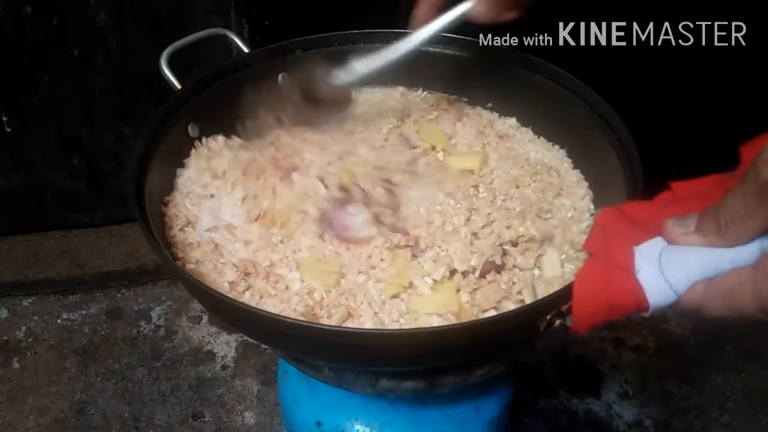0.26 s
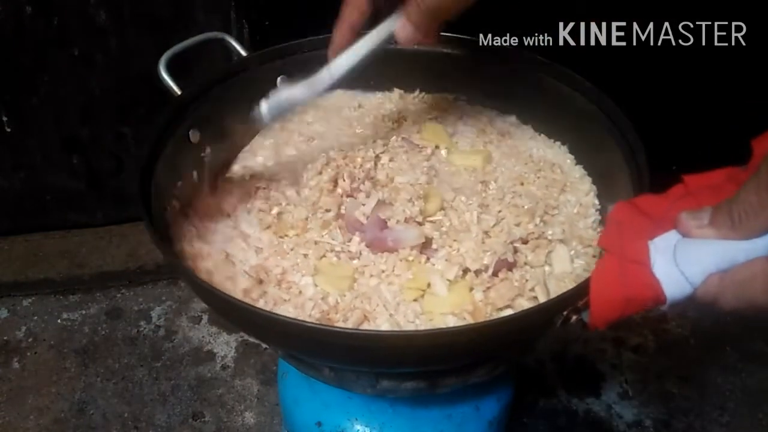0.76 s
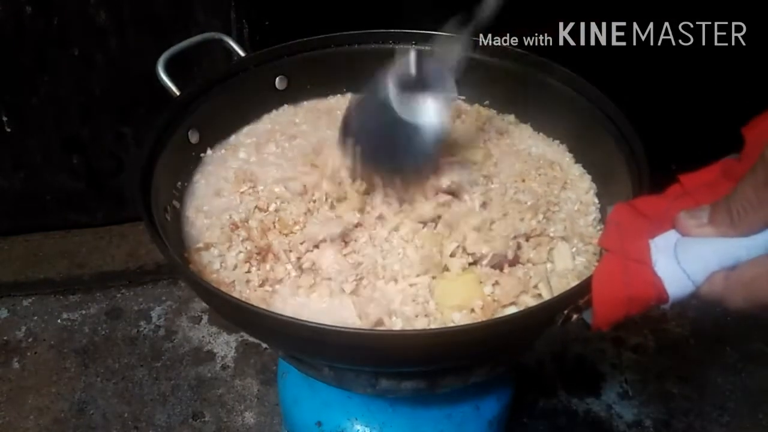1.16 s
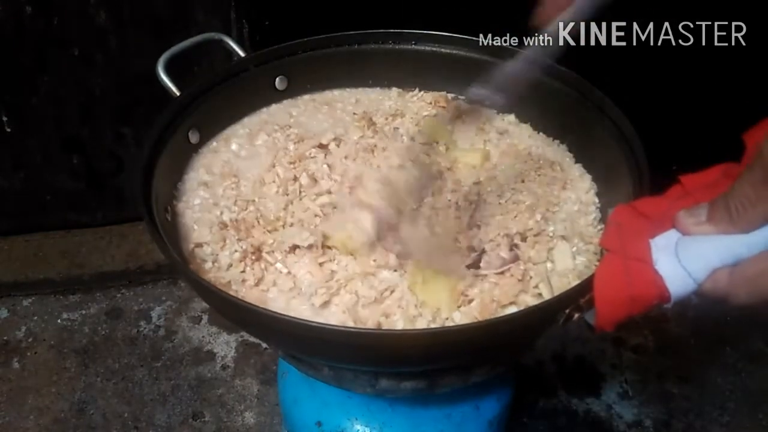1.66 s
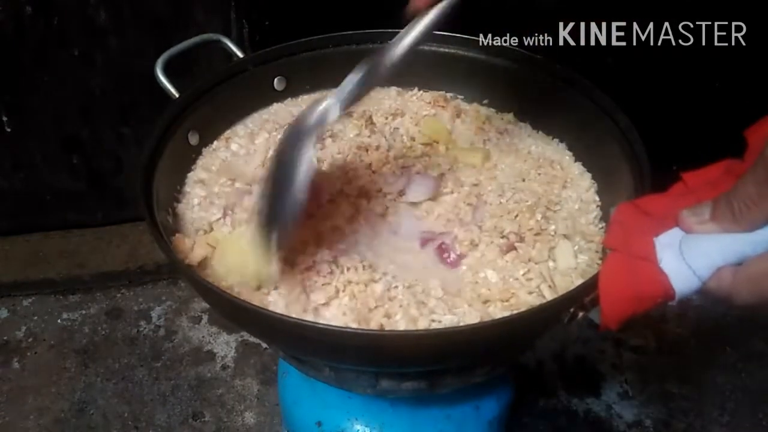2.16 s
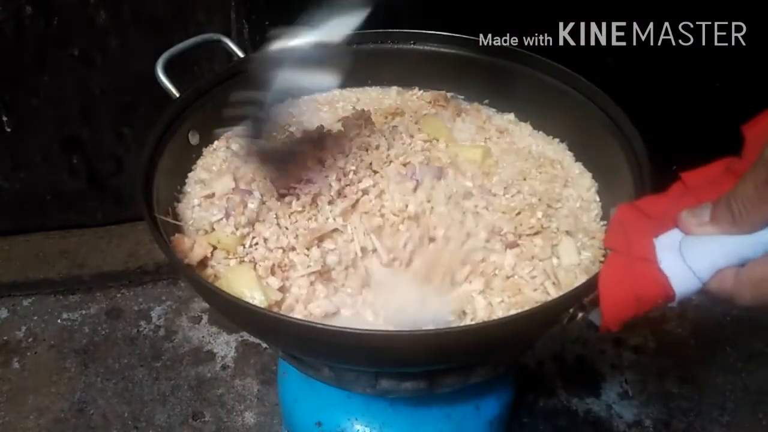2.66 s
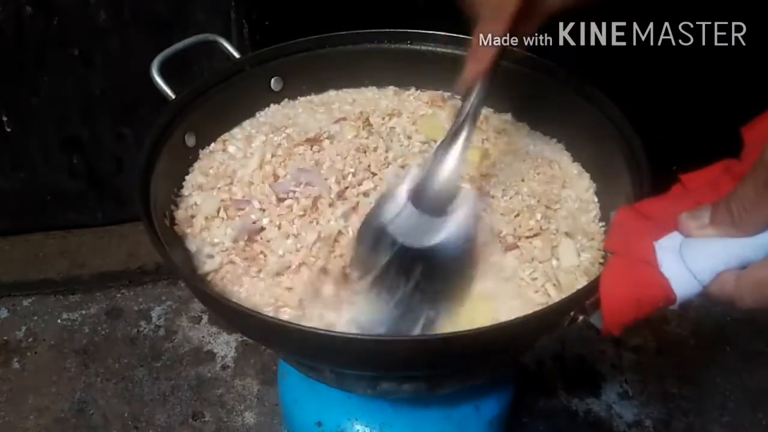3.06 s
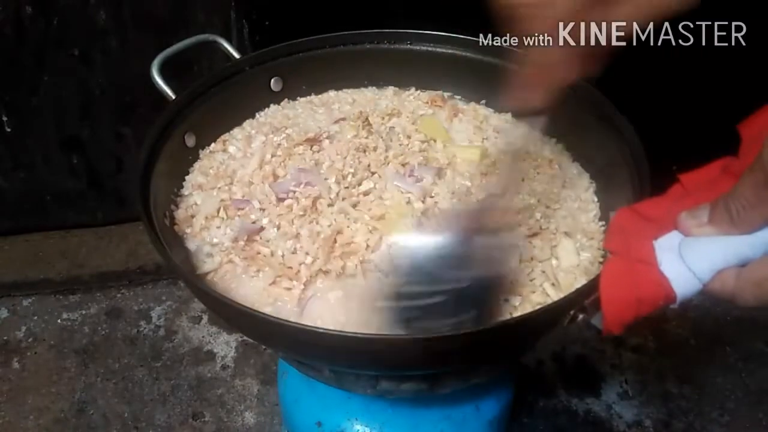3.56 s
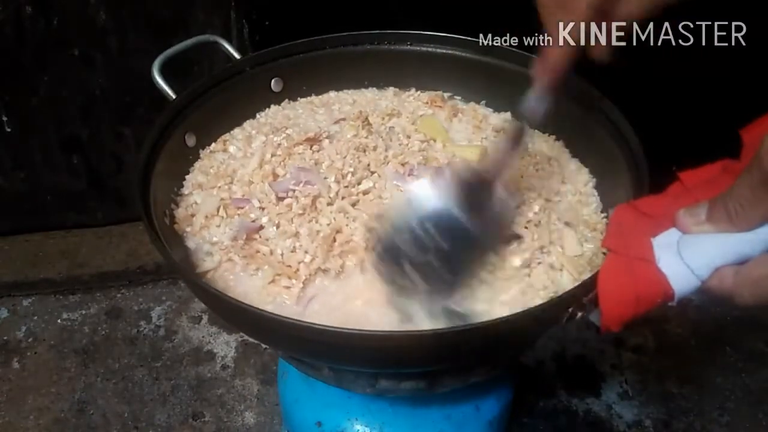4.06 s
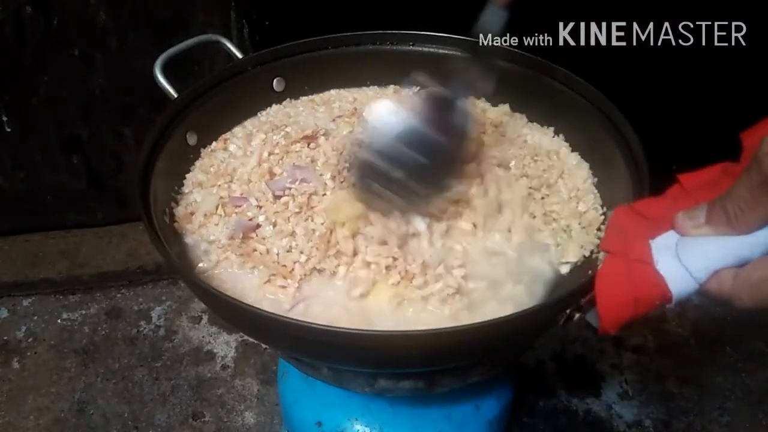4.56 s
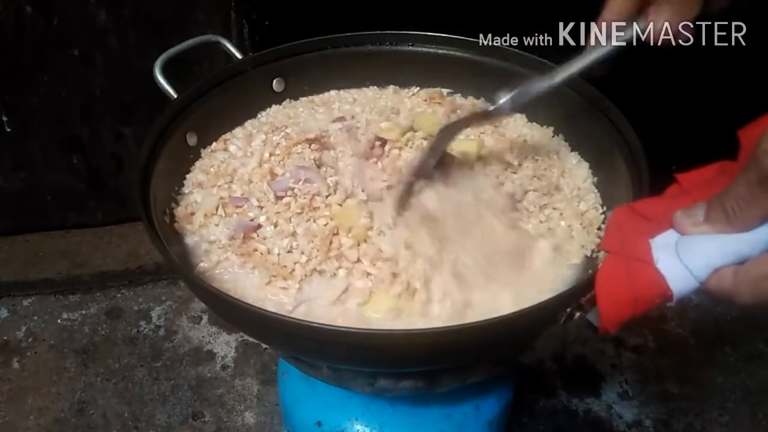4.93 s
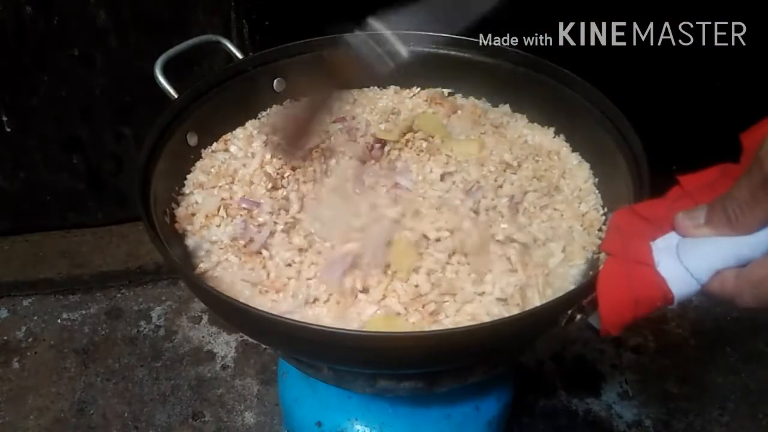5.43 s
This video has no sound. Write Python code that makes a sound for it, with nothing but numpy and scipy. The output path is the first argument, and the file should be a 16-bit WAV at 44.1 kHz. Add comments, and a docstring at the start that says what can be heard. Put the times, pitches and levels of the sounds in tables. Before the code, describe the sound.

A metal ladle stirs a thick wet rice mixture in a wok, knocking and scraping the pan with ringing clanks.

```python
"""Close by in a small kitchen, a steel ladle turns a thick rice mixture in a wok; one mono microphone.
A knock opens: a short contact excites decaying pan and ladle modes. Stirs fizz as filtered clicks and noise,
with a few wet pops; shoves swell a low rumble of the stand. From 1.6 s more knocks come, each led by a soft bump,
and from 2.5 s slides up the wall, stick-slip clicks that ring the steel harder as they go. From 4.1 s a faint low hum
of three partials swells and fades; near 5.4 s the ladle drags and rubs; a last knock falls in it, singing lasts beyond."""
import sys
import numpy as np
from scipy import signal
from scipy.fft import rfft, irfft
from scipy.io import wavfile
from scipy.ndimage import uniform_filter1d

SR = 44100
rng = np.random.default_rng(int(sys.argv[2]) if len(sys.argv) > 2 else 0)


def pcm_store(signal):
    """Save signal as 16-bit PCM."""
    levels = np.round(np.clip(np.atleast_2d(signal), -1, 1) * 32767)
    wavfile.write(sys.argv[1], SR, levels.astype(np.int16).T)


N = 250929
T = np.arange(N) / SR

# Ladle blows on the pan: [t/s, contact/ms, buzz 0-1 (acts up to 0.7), favoured bowl, wall and ladle modes f/Hz (3),
# bowl, wall and ladle level/dB (3), fall of the wall's sound away from its mode dB/octave]
BLOWS = [(0.0, 1.1, 0.11, 645, 905, 7650, -58, -47.5, -49, 4),
         (1.6372, 1.06, 0, 303, 919, 7600, -45.5, -34.5, -40, 3),
         (1.967, 0.72, 0, 425, 2170, 5959, -52.5, -37, -29.5, 2),
         (2.481, 1.15, 0.41, 442, 2230, 9345, -63.5, -52, -44, -0.5),
         (2.619, 3.7, 0, 595, 1250, 9400, -57.5, -44.5, -65, 2),
         (3.0363, 0.96, 0.13, 635, 2610, 4400, -74, -82, -60, 20),
         (3.229, 7.5, 0, 464, 1039, 9280, -64, -38, -61, 8),
         (3.241, 9.5, 0, 627, 1502, 9280, -77, -42.5, -55, 18.5),
         (3.6168, 0.86, 0.6, 413, 1062, 8700, -57, -47.5, -41.5, -1),
         (3.625, 2.7, 0.73, 433, 1060, 9300, -54.5, -47.5, -41, 9),
         (3.694, 1.7, 0.3, 415, 1090, 8550, -68, -71, -54.5, 7),
         (3.736, 3.9, .5, 433, 2220, 8700, -69.5, -72, -51.5, 2),
         (4.1016, 2.3, 0.25, 442, 1496, 10322, -64.5, -49, -37.5, 2.5),
         (4.229, 4.5, 0.014, 615, 904, 9300, -72, -57.5, -60, 15),
         (4.4833, 2.9, 0.28, 308, 2328, 4250, -60.5, -47.5, -38, -3),
         (4.618, 8.6, 0.15, 604, 888, 9150, -68.5, -50.5, -51.5, 10),
         (5.49, 11, 0.37, 273, 1145, 8231, -67, -57.5, -82, 17)]


def undb(db):
    """Decibels to gain."""
    return 10 ** (np.asarray(db) / 20)


def unit(x):
    """Scale to rms 1."""
    return x / np.sqrt(np.mean(x ** 2) + 1e-24)


def fade(t, t60):
    """Exponential decay that loses 60 dB in t60 seconds."""
    return np.exp(-np.log(1000) * t / max(t60, 1e-3))


def curve(rows, column=1):
    """Gain over time from a dB column of (s, ..) rows."""
    rows = np.asarray(rows)
    return undb(np.interp(T, rows[:, 0], rows[:, column]))


def gesture(start, length, attack, t60):
    """Gain of one movement: it rises over attack seconds, holds to the end of its length, then dies away."""
    rise = np.clip((T - start) / max(attack, 1e-3), 0, 1)
    return rise * fade(np.maximum(T - start - length, 0), t60)


def flutter(rate, depth_db):
    """A gain that wanders at random, about rate times a second."""
    knots = rng.standard_normal(2048)
    return undb(depth_db * np.interp(T * rate, np.arange(len(knots)), knots))


def clicks(rate, spread_db):
    """Random tiny impacts, on average rate a second, of uneven size and either sign."""
    sizes = undb(spread_db * np.minimum(rng.exponential(size=N), 4))
    signed = sizes * rng.choice([-1, 1], N)
    return unit(signed * (rng.random(N) < rate / SR))


def band(x, lo, hi, order=3):
    """Band-pass between two edges in Hz."""
    sos = signal.butter(order, [lo, min(hi, .45 * SR)], "band", fs=SR, output="sos")
    return signal.sosfilt(sos, x)


def colour(x, points):
    """Filter by a (Hz, dB) spectrum, causally, so that attacks stay sharp."""
    hz, db = np.transpose(points)
    size = 2048
    f = np.maximum(np.fft.rfftfreq(size, 1 / SR), 1)
    cepstrum = irfft(np.log(undb(np.interp(np.log(f), np.log(hz), db))))
    # folding the cepstrum gives minimum phase
    cepstrum[1:size // 2] *= 2
    cepstrum[size // 2 + 1:] = 0
    response = irfft(np.exp(rfft(cepstrum)))
    return signal.fftconvolve(x, response)[:len(x)]


def focus(x, hz, db_per_octave):
    """Weaken a sound by so many dB for each octave away from hz; a negative slope lifts it instead."""
    octaves = np.arange(-3, 4)
    return colour(x, np.transpose([hz * 2. ** octaves, -db_per_octave * np.abs(octaves)]))


def hum():
    """A low hum, as of a motor some way off: wavering harmonics that swell and die away."""
    # Partials of the hum: [multiple of the fundamental, level/dB]
    partials = [(1, 0), (2, -21), (3, -24)]
    hum_hz, level_db = 75.2, -57
    start_s, length_s, attack_s, release_t60 = 4.084, 1.306, 0.42, 0.42
    tone = sum(undb(db) * np.sin(2 * np.pi * k * hum_hz * T) for k, db in partials)
    swell = gesture(start_s, length_s, attack_s, release_t60)
    return undb(level_db) * unit(tone) * swell * flutter(rate=18, depth_db=3)


def stand(rock_s=0.06):
    """Shoves and knocks rock the heavy pan on its stand: low noise swelling over a faint rumble."""
    # Spectrum of the stand: [f/Hz, level/dB per Hz]
    stand_spectrum = [(25, -31), (50, -12.5), (68, -2), (78, -11.5), (90, -2), (102, -6.5), (120, -10.5),
                      (160, -13), (220, -25.5)]
    # Shoves on the pan: [t/s, length/s, level/dB]
    shoves = [(.29, .05, -64), (.47, .13, -58), (1.01, 0.037, -70), (1.22, 0.047, -72), (1.54, 0.03, -61.5),
              (2.25, 0.031, -85.5), (2.39, 0.16, -63.5), (2.71, 0.037, -60.5), (2.96, 0.047, -63),
              (3.26, 0.03, -63), (3.39, 0.026, -58), (3.745, 0.049, -55.5)]
    attack_s, release_t60 = 0.026, 0.34
    rumble_db, knock_rock_db = -71.5, -12  # steady rumble; rocking by a knock, relative to its bowl level
    rumble = unit(band(colour(rng.standard_normal(N), stand_spectrum), 22, 260))
    # dividing by its own 0.1 s level evens the rumble out
    swell = np.sqrt(uniform_filter1d(rumble ** 2, SR // 10))
    knock_pushes = [(s, rock_s, bowl_db + knock_rock_db) for s, _, _, _, _, _, bowl_db, *_ in BLOWS]
    pushes = list(shoves) + knock_pushes
    power = sum((undb(db) * gesture(s, length, attack_s, release_t60)) ** 2 for s, length, db in pushes)
    return rumble / swell * np.sqrt(power + undb(rumble_db) ** 2)


def mixture(fizz_rest_db=-83):
    """Wet grains slide and part: small low squelches under a fine fizz that swells and settles with each stir."""
    # Spectrum of the squelches: [f/Hz, level/dB per Hz]
    squelch_spectrum = [(120, 0.5), (220, -17), (500, -2.5), (800, -4), (1020, 4.5), (1200, -2),
                        (1450, -2.5), (1700, -5), (2050, -0.5), (2400, -8), (2650, 5.5), (2950, -16),
                        (4000, -20.5), (7000, -18.5)]
    # Edges of the bands that flutter apart: [f/Hz]
    squelch_edges = [90, 450, 850, 1250, 1800, 2350, 12000]
    # Spectrum of the fizz: [f/Hz, level/dB per Hz]
    fizz_spectrum = [(2500, -25), (4200, -23.5), (5800, -16.5), (7300, -6.5), (8200, 3), (9500, 0),
                     (11200, 0), (12000, -11), (14200, -11)]
    # Ladle pushing through the food: [t/s, length/s, fizz level/dB]
    stirs = [(-.1, 1.12, -64.5), (1.192, 0.044, -64), (1.526, 0.34, -62.5), (2.03, 0.28, -62.5),
             (2.361, 0.41, -63.5), (3.057, 0.5, -63.5), (3.316, 0.14, -68), (3.753, 0.092, -59.5),
             (4.144, 0.13, -61), (4.578, 0.14, -62), (4.93, 0.06, -71), (5.087, 0.043, -67.5),
             (5.36, 0.065, -66)]
    attack_s, settle_t60 = 0.052, 1
    squelch_rest_db, squelch_stir_db = -70, -6  # food at rest; what stirring adds, relative to the fizz
    movements = [undb(db) * gesture(s, length, attack_s, settle_t60) for s, length, db in stirs]
    stirring = np.max(movements, axis=0)

    squelch = np.zeros(N)
    for lo, hi in zip(squelch_edges, squelch_edges[1:]):
        grains = clicks(rate=1800, spread_db=-1) + 0.46 * rng.standard_normal(N)
        # squelches of different size come and go on their own
        squelch += band(colour(grains, squelch_spectrum), lo, hi) * flutter(rate=15, depth_db=3)
    squelch_gain = np.hypot(undb(squelch_rest_db), undb(squelch_stir_db) * stirring)

    fine_grains = clicks(rate=8700, spread_db=4.5) + 0.98 * rng.standard_normal(N)
    fizz = unit(colour(fine_grains, fizz_spectrum))
    fizz_gain = np.hypot(undb(fizz_rest_db), stirring)
    return (unit(squelch) * squelch_gain * flutter(rate=23, depth_db=1.34)
            + fizz * fizz_gain * flutter(rate=9.7, depth_db=-0.5))


def pops(pop_t60=0.14):
    """A pocket in the wet food opens with a short smack: band-passed noise that starts at once and decays."""
    # Small wet pops: [t/s, f/Hz, width/Hz, level/dB]
    pockets = [(0.336, 600, 600, -64), (.692, 3500, 900, -77), (1.021, 2770, 250, -68),
               (5.093, 2900, 980, -58.5)]
    out = np.zeros(N)
    for s, hz, width, db in pockets:
        smack = unit(band(rng.standard_normal(N), hz - width / 2, hz + width / 2, order=2))
        out += undb(db) * smack * (T >= s) * fade(np.abs(T - s), pop_t60)
    return out


def drag():
    """Cushioned by food, the ladle's rub stirs a few low resonances of the pan, and one mode sings."""
    # Ladle dragged through the food: [t/s, rub level/dB, singing mode level/dB]
    strokes = [(5.32, -78, -95.5), (5.38, -60, -86.5), (5.43, -66.5, -73), (5.48, -68.5, -66),
               (5.56, -63, -65), (5.63, -69, -63.5), (5.69, -71, -78)]
    # Low resonances of the pan: [f/Hz, width/Hz, level/dB]
    resonances = [(263, 60, 0.5), (799, 51, 0), (1010, 137.3, -6), (990, 190, -6), (1390, 95, -2.5)]
    singing_hz = 1460
    rub = clicks(rate=2200, spread_db=2.5)
    body = sum(undb(db) * band(rub, hz - width / 2, hz + width / 2, order=1) for hz, width, db in resonances)
    # the sung pitch wavers slightly around its mode
    phase = 2 * np.pi * np.cumsum(singing_hz * flutter(rate=210, depth_db=0.14)) / SR
    singing = unit(np.sin(phase) * flutter(rate=54, depth_db=3.5))
    return unit(band(body, 170, 1700)) * curve(strokes, column=1) + singing * curve(strokes, column=2)


def plunges(plunge_db=1.5, lead_s=0.0058, push_hz=420, push_t60=0.078):
    """Just before steel meets steel, the ladle pushes through the food with a soft, low bump of noise."""
    out = np.zeros(N)
    t = T[:SR // 10]
    for s, _, _, _, _, _, bowl_db, *_ in BLOWS:
        start = max(int((s - lead_s) * SR), 0)
        bump = unit(band(rng.standard_normal(len(t)), push_hz / 2, push_hz * 2, order=2))
        envelope = fade(t, push_t60) * np.minimum(t * push_hz, 1)
        out[start:start + len(t)] += undb(bowl_db + plunge_db) * bump * envelope
    return out


def contact(t, ms, touch=0.1):
    """Energy of a blow over time: a first touch, then uneven chatter for some milliseconds."""
    age = t / (ms / 1000)
    chatter = rng.standard_normal(len(t)) ** 4 * age * np.exp(-2 * age)
    energy = chatter / chatter.sum()
    energy[0] += abs(touch) / ms  # the longer the contact, the softer its first touch
    return energy / energy.sum()


def ring(t, modes, detune=0.004):
    """Sum of decaying modes; the place of contact sets each one's strength, the shifting load detunes it."""
    chance = rng.standard_normal((len(modes), 3))
    strengths = np.sign(chance[:, 0]) * undb(2.5 * chance[:, 1])
    tunings = 1 + detune * chance[:, 2]
    out = np.zeros(len(t))
    for (hz, db, t60), strength, tuning in zip(modes, strengths, tunings):
        out += strength * undb(db) * np.sin(2 * np.pi * hz * tuning * t) * fade(t, t60)
    return out


def steel(t, energy, favoured=(), crowd_db=7, crack_db=21, crowd_t60=0.25, crack_t60=0.0036,
          faint_db=-21, faint_t60=0.22):
    """Answer of pan and ladle: a crack, clear modes, a crowd of weak ones; a faint kitchen tail decays as
    quickly."""
    # Modes of the loaded wok and the ladle: [f/Hz, level/dB, t60/s]
    clear_modes = [(303.7, -14, 0.46), (438, -4.5, 0.22), (560, -11.5, 0.15), (621, -2, 0.25),
                   (871, -10, 0.34), (933, -14, 0.2), (1033, 0.5, 0.25), (1407, -5.5, 0.17),
                   (1468, -10.5, 0.41), (1695, -1.5, 0.12), (2020, -7.5, 0.23), (2180, 3.5, 0.07),
                   (2310, 2.5, 0.1), (2620, -24, 0.16), (2964, -4.5, 0.15), (3475, -16.5, 0.047),
                   (3865, -13.5, 0.19), (4370, -10, 0.14), (5150, -7.5, .15), (5823, -11, 0.18),
                   (5990, -14.5, 0.22), (6640, -15.5, 0.17), (7710, -0.5, 0.047), (8435, -3.5, .16),
                   (8320, -3.5, 0.18), (9950, -9.5, 0.14)]
    # Spectrum of the crowd of weaker modes: [f/Hz, level/dB per Hz]
    crowd_spectrum = [(200, -12), (300, -10), (420, -0.5), (750, 3.5), (1050, 2.5), (2200, 4), (3000, -4.5),
                      (5000, -8), (7000, -5.5), (9000, 0), (10400, -3), (11500, -12), (14200, -15)]
    crack = undb(crack_db) * fade(t, crack_t60)
    crowd_decay = undb(crowd_db) * fade(t, crowd_t60)
    faint = undb(faint_db) * fade(t, faint_t60)
    decay = crack + crowd_decay + faint
    # the small impacts of one blow add up in energy
    envelope = np.sqrt(np.abs(signal.fftconvolve(energy, decay ** 2)[:len(t)]))
    crowd = unit(colour(rng.standard_normal(len(t)), crowd_spectrum)) * envelope
    return ring(t, list(clear_modes) + list(favoured)) * np.sqrt(np.cumsum(energy)) + crowd


def buzz(x, share):
    """The edge rebounds, each time weaker, which gathers the sound in evenly spaced bands."""
    lag = int(SR / 1101.6)  # samples between rebounds, about 1100 a second
    feedback = np.zeros(lag + 1)
    feedback[0], feedback[lag] = 1, -np.clip(share, 0, .7)
    return signal.lfilter([1], feedback, x)


def scrapes(pan_db=-1):
    """The ladle's edge sticks and slips up the wall; the slips hiss and keep the pan ringing."""
    # Spectrum of the edge's hiss: [f/Hz, level/dB per Hz]
    edge_spectrum = [(2700, -12.5), (3100, -23), (4400, -12.5), (5600, -11), (7400, -9.5), (8600, -6.5),
                     (9600, -4), (10600, -10), (12000, -2), (14200, -14)]
    # Slides up the wall: [t/s, length/s, edge hiss level/dB, pan ring level/dB before pan_db, buzz 0-1]
    slides = [(2.546, 0.094, -45, -54, 0.3), (3.034, 0.06, -57.5, -66.5, 0.2), (3.236, 0.033, -39, -63, 0),
              (3.67, 0.023, -47.5, -65, 0.45), (3.768, 0.055, -41.5, -46.5, .6),
              (4.169, 0.016, -43.5, -66, .2), (4.204, 0.018, -38, -58, 0.2), (4.521, 0.092, -44, -47.5, 0)]
    attack_s, release_t60 = 0.0072, .07
    hiss_growth_db, ring_growth_db = 3.5, 6.5  # the edge presses harder from start to end of a slide
    slips = clicks(rate=3000, spread_db=2) * flutter(rate=130, depth_db=2.5)
    t = T[:SR // 2]
    out = np.zeros(N)
    for s, length, hiss_db, ring_db, share in slides:
        touching = slips * gesture(s - attack_s, length + attack_s, attack_s, release_t60)
        ahead = np.clip(1 - (T - s) / length, 0, 1)  # share of the slide still to go
        # every stroke meets another part of the wall
        wall = steel(t, contact(t, 0.98), crack_db=30.5)
        edge = colour(band(wall, 2700, 15000), edge_spectrum)
        pan = band(buzz(wall, share), 700, 2700)
        edge_force_db = hiss_db - hiss_growth_db * ahead
        pan_force_db = pan_db + ring_db - ring_growth_db * ahead
        for answer, force_db in ((edge, edge_force_db), (pan, pan_force_db)):
            out += signal.oaconvolve(touching * undb(force_db), answer / np.linalg.norm(answer))[:N]
    return out


def knocks(bowl_mode_db=-2, wall_mode_db=6, ladle_mode_db=0, bowl_t60=0.19, wall_t60=0.14, ladle_t60=0.16):
    """Each blow rings the same steel; where it lands sets favoured modes and levels of bowl, wall and ladle."""
    # Edges of the bowl, wall and ladle bands: [f/Hz]
    part_edges = [240, 700, 2700, 14000]
    skid_mode_db = 2.5  # gain of the wall's favoured mode for each tenfold contact time
    ladle_focus_db = 1.5  # dB per octave after a 1 ms contact; grows with the root of the contact time
    t = T[:int(.8 * SR)]
    early = int(.06 * SR)  # each band's level is set over its first 60 ms
    out = np.zeros(N + len(t))
    for s, ms, share, bowl_hz, wall_hz, ladle_hz, bowl_db, wall_db, ladle_db, wall_focus in BLOWS:
        favoured = [(bowl_hz, bowl_mode_db, bowl_t60),
                    (wall_hz, wall_mode_db + skid_mode_db * np.log10(ms), wall_t60),
                    (ladle_hz, ladle_mode_db, ladle_t60)]
        blow = buzz(steel(t, contact(t, ms), favoured), share)
        wall = focus(blow, wall_hz, wall_focus)
        ladle = focus(blow, ladle_hz, ladle_focus_db * np.sqrt(ms))
        parts = [(blow, bowl_db), (wall, wall_db), (ladle, ladle_db)]
        start = max(int(s * SR), 0)
        for lo, hi, (part, db) in zip(part_edges, part_edges[1:], parts):
            part = band(part, lo, hi, order=5)
            out[start:start + len(t)] += part * undb(db) / np.std(part[:early])
    return out[:N]


def scene():
    """All sources summed at one close microphone."""
    background = hum() + stand()
    food = mixture() + pops() + drag() + plunges()
    return (background + food + scrapes() + knocks())[None]


def record(dry):
    """The recorder cuts the top of the treble, steeply above 14.4 kHz."""
    return signal.sosfilt(signal.ellip(10, .2, 70, 14400, fs=SR, output="sos"), dry)


dry = scene()
out = record(dry)
pcm_store(out)
```